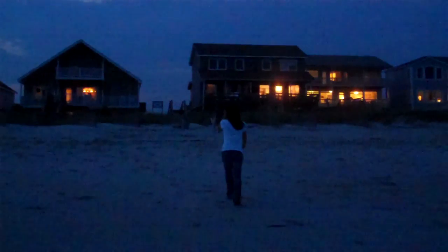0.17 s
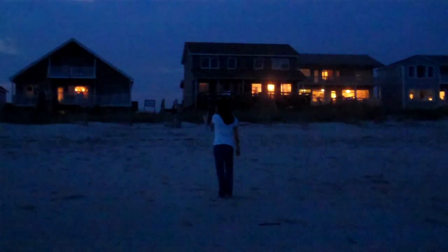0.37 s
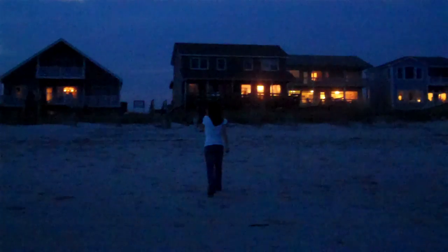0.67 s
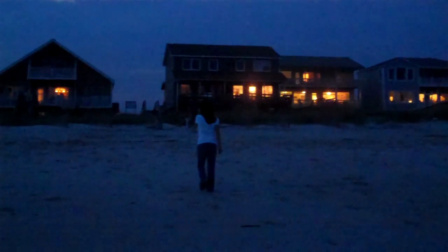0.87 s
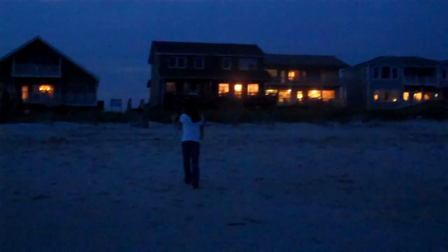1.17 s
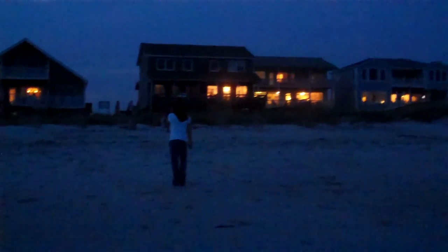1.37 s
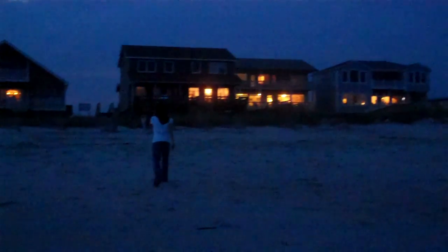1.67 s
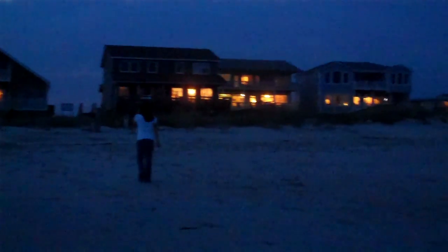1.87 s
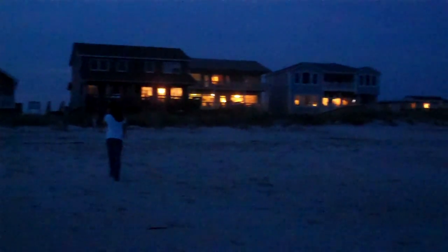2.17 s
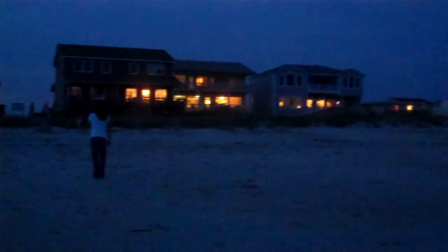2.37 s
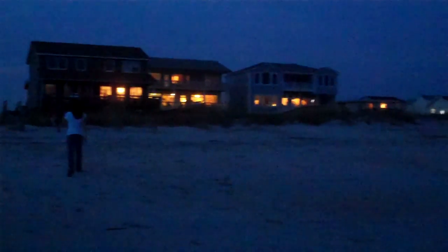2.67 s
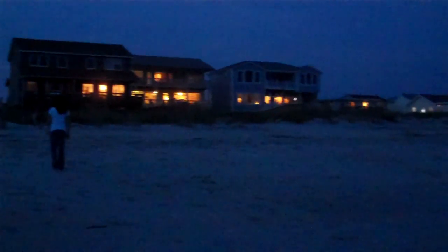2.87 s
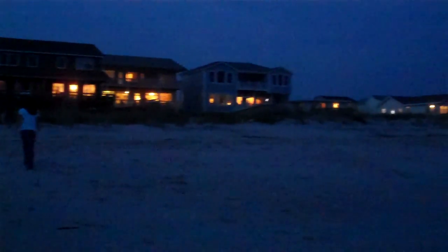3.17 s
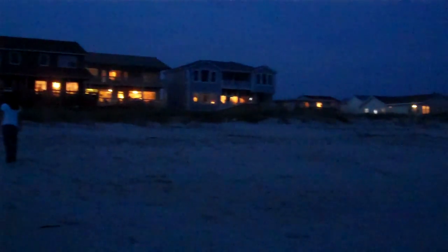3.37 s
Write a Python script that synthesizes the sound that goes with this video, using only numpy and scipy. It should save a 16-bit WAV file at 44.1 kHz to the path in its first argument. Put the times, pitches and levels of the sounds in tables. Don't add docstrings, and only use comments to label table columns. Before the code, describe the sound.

Wind buffets and rumbles against a small stereo microphone while surf hisses steadily behind it.

```python
import sys
import numpy as np
from scipy import signal
from scipy.io import wavfile
from scipy.ndimage import uniform_filter1d

SR = 44100
rng = np.random.default_rng(int(sys.argv[2]) if len(sys.argv) > 2 else 0)


def field_ratio(decibels):
    return 10 ** (np.asarray(decibels, dtype=float) / 20)


def store_wav(level_fs):
    pcm = np.round(np.clip(np.atleast_2d(level_fs), -1, 1) * 32767)
    wavfile.write(sys.argv[1], SR, pcm.T.astype(np.int16))


N = 154791
LEFT, RIGHT = 0, 1


def evened(x):
    return x / np.sqrt(np.mean(x ** 2) + 1e-20)


def read(points, hz):
    f, value = np.transpose(points)
    return np.interp(np.log(hz + 1), np.log(f + 1), value)


def drifting_patches(noise, frames, bands):
    slow = uniform_filter1d(noise, size=frames, axis=0)
    return evened(uniform_filter1d(slow, size=bands, axis=1))


# [t/s, level/dB, extra roar of the breaking
# crest/dB]
WAVE = [(0.0, -44.5, 2.5), (0.49, -41.5, 2), (0.8, -43, 3.5), (1.24, -40.5, 1), (1.81, -43.5, 1.5),
        (1.83, -46.5, 0), (2.61, -47.5, -1), (3.1, -43, 0), (3.15, -46.5, -0.5), (3.5, -47, -1),
        (3.51, -43, 0)]
# [f/Hz, level/dB per Hz]
FOAM = [(150, 1.5), (450, 4), (800, -0.5), (1300, -1), (2050, -6), (2450, -8), (4500, -12.5), (8500, -27.5),
        (11000, -31.5), (13000, -36)]
# [f/Hz, correlation]
SAME = [(150, .6), (450, .9), (1200, .85), (2500, .55), (5000, .72), (8500, .5), (12000, .5)]
# [f/Hz, lead/rad]
LEAD = [(0, 0), (1700, -.4), (2600, -2.1), (3400, -3), (5700, -3.5), (8200, -5.8), (12000, -6.3),
        (13600, -8.5)]
# [f/Hz, level/dB]
LEAN = [(60, -8), (150, -3), (360, -2.5), (900, -1.5), (2210, -2), (5450, -6.5), (13400, -16)]


def surf():
    size, hop = 512, 128
    roar_top_hz, patchy_db, flicker_db = 2210, 0.76, 0.35
    frames, hz = N // hop + 5, np.fft.rfftfreq(size, 1 / SR)
    a, b, c, d, patches = rng.standard_normal((frames, len(hz), 5)).T
    flicker = drifting_patches(patches, 40, 4)
    patches = drifting_patches(patches, 6, 24)

    same = np.clip(read(SAME, hz), -1, 1)[:, None]
    left = a + 1j * b
    right = same * left + np.sqrt(1 - same ** 2) * (c + 1j * d)
    right *= (field_ratio(-read(LEAN, hz)) * np.exp(-1j * read(LEAD, hz)))[:, None]

    t = np.arange(frames) * hop / SR
    s, level_db, roar_db = np.transpose(WAVE)
    crest_db = np.interp(t, s, roar_db) / (1 + (hz[:, None] / roar_top_hz) ** 8)
    wave_db = crest_db + np.interp(t, s, level_db) - 0.5
    foam_db = read(FOAM, hz)[:, None] + patchy_db * patches + flicker_db * flicker
    z = np.array([left, right]) * field_ratio(foam_db + wave_db)
    return signal.istft(z, nperseg=size, noverlap=size - hop)[1][:, :N]


def eddies(low_hz, high_hz, slope_db, count=12):
    per_s, spread_db = 520, 3.0
    out = np.zeros(N)
    for hz in np.geomspace(low_hz, high_hz, count):
        u = np.arange(0, 1.6, hz / SR)
        lump = np.hanning(len(u)) * np.sin(2 * np.pi * (u + rng.random()))
        hits = (rng.random(N) < per_s / count / SR) * rng.choice([-1., 1.], N)
        hits *= field_ratio(spread_db * np.minimum(rng.exponential(1, N), 3))
        train = evened(signal.oaconvolve(hits, lump)[:N])
        out += field_ratio(slope_db * np.log2(hz / low_hz)) * train
    return evened(out)


# [t/s, left port level/dB, right port level/dB]
BREEZE = [(0, -29, -23.5), (.2, -35, -29.5), (.5, -38, -28.5), (.8, -33, -45), (1.1, -36.5, -28),
          (1.3, -20, -24), (1.6, -28, -32), (1.8, -25, -35), (1.95, -55, -29), (2.2, -18.5, -31),
          (2.55, -35, -27.5), (2.7, -28, -40), (2.85, -30, -30.5), (3.1, -9.5, -27), (3.22, -46, -45),
          (3.38, -42.5, -42), (3.51, -19, -31)]


def breeze(side, rumble, flutter):
    flutter_db = -11.5
    columns = np.transpose(BREEZE)
    level_db = np.interp(np.arange(N) / SR, columns[0], columns[1 + side])
    return field_ratio(level_db) * (rumble + field_ratio(flutter_db) * flutter)


# [peak t/s, width/s, level/dB, flutter over rumble/dB]
LEFT_BUFFETS = [(0.223, 0.016, -32, -12), (1.197, 0.046, -27, -32), (1.401, 0.026, -5.5, -16),
                (1.445, 0.049, -19, -2), (1.513, 0.062, -17.5, -20), (1.559, 0.025, -21, -5),
                (1.705, 0.016, -16, -21), (1.757, 0.025, -13, 7), (1.784, 0.008, -7, -9),
                (1.827, 0.034, -37, -25), (1.853, 0.19, -16.5, -7.5), (1.895, 0.0092, -41, -17),
                (1.98, 0.007, -15.5, -4), (2.047, 0.019, -11.5, -13), (2.117, 0.05, -19.5, -8),
                (2.143, 0.041, -21, -9), (2.17, 0.011, -6, -1), (2.256, 0.01, -14, -10),
                (2.388, 0.038, -8, -9), (2.461, 0.013, -16.5, -8), (2.496, 0.016, -11.5, -13),
                (2.599, 0.026, -14.5, -12), (2.813, 0.022, -16, -8), (2.853, 0.013, -15, -17),
                (2.933, 0.014, -11, 3), (2.991, 0.029, -22, 4), (3.034, 0.059, -17.5, 12),
                (3.057, 0.016, -15, -2), (3.091, 0.049, -9.5, -3.5), (3.19, 0.03, -26, -7)]
RIGHT_BUFFETS = [(0.047, 0.029, -31, -15), (0.084, 0.014, -18, 1), (0.163, 0.014, -21, -25),
                 (0.202, 0.0071, -25, -4), (0.462, 0.038, -23, -9), (0.514, 0.011, -22, 9),
                 (0.629, 0.042, -22, -16), (0.696, 0.021, -19, -24), (0.788, 0.024, -22, -31),
                 (0.947, 0.016, -15, -21), (1.084, 0.02, -24, -6), (1.276, 0.018, -12, -5),
                 (1.348, 0.024, -26, -9), (1.416, 0.022, -22, -24), (1.457, 0.011, -1, -6),
                 (1.501, 0.031, -19, -7), (1.572, 0.016, -3, -3), (1.633, 0.012, -12, -12),
                 (1.773, 0.065, -16.5, -8), (1.813, 0.016, -26, -3.6), (1.883, 0.036, -19, 0),
                 (2.072, 0.02, -28, -17), (2.131, 0.051, -22, -26), (2.166, 0.02, -25, -2.4),
                 (2.191, 0.082, -21, -2), (2.437, 0.077, -26, -2), (2.924, 0.0054, -14, -15),
                 (3.01, 0.022, -20, -15), (3.065, 0.018, -13, -24), (3.134, 0.01, -8, -6.5)]


def buffets(side, rumble, flutter):
    snap_hz, snap_db = 1300, -21.5
    rumble_lingers = 0.6
    band = signal.butter(2, [snap_hz / 2, snap_hz], "bandpass", fs=SR, output="sos")
    snap = evened(signal.sosfilt(band, rng.standard_normal(N)))
    t, out = np.arange(N) / SR, np.zeros(N)
    for s, width, db, flutter_db in (LEFT_BUFFETS, RIGHT_BUFFETS)[side]:
        near = slice(max(round((s - 2 * width) * SR), 0), round((s + 2 * width) * SR))
        shape = np.exp(-2.8 * ((t[near] - s) / width) ** 2)
        size = np.sqrt(np.mean(shape ** 2))
        low = evened(shape ** rumble_lingers * rumble[near]) * size
        high = evened(shape * flutter[near]) * size
        high += field_ratio(snap_db + 0.61 * (db + 24)) * shape ** 2 * snap[near]
        gust = low + field_ratio(flutter_db) * high
        out[near] += field_ratio(db) * gust / np.sqrt(1 + field_ratio(flutter_db) ** 2)
    return out


# [t/s, peak level/dB, f/Hz]
LEFT_SLAPS = [(0.22, -8.5, 190), (1.2608, -15, 220), (1.3758, -6, 120), (1.4003, -4, 700),
              (1.3896, -7, 100), (1.4017, -2, 130), (1.4143, -3, 372), (1.442, -7.5, 257),
              (1.4516, -3, 210), (1.4644, -13, 260), (1.5128, -4.5, 131), (1.5431, -11.5, 240),
              (1.5531, -10.5, 130), (1.5613, -4, 198), (1.7015, -13, 230), (1.7326, -9, 330),
              (1.754, -6, 476), (1.7554, 0.5, 382), (1.7637, -14, 510), (1.7744, -0.5, 220),
              (1.7907, 2, 210), (1.792, -5, 60), (1.7941, 4, 430), (1.7957, -6, 600), (1.8278, -10, 170),
              (1.8947, -12, 260), (2.0488, -14, 252), (2.1157, -6.5, 260), (2.1653, -8, 210),
              (2.1731, -4.5, 140), (2.2583, -7.5, 228), (2.356, -2, 340), (2.3706, -5.5, 434),
              (2.3749, -2.5, 150), (2.3893, -3.5, 218), (2.4052, -4.5, 247), (2.492, -13, 110),
              (2.507, -9, 140), (2.5851, -6, 218), (2.611, -14.5, 110), (2.8523, -12, 150),
              (2.9291, -4.5, 370), (2.9316, -5.5, 180), (2.9758, -8, 150), (2.9892, -13, 210),
              (2.9944, -7, 440), (3.0164, -12, 420), (3.0277, -6, 140), (3.0334, 1, 210), (3.0505, -9, 290),
              (3.0579, -4, 140), (3.0629, -5, 380), (3.0824, -1, 320), (3.0905, -1, 320), (3.1073, -3, 950),
              (3.1088, -2, 150), (3.1141, -3.5, 335), (3.1181, -7, 278), (3.128, -2.5, 340),
              (3.179, -9, 101)]
RIGHT_SLAPS = [(0.088, -14, 75), (0.162, -14, 110), (0.454, -13, 100), (0.594, -13, 65), (0.6226, -9, 180),
               (0.6405, -6.5, 340), (0.9455, -12, 139), (1.268, -19, 310), (1.2757, -2, 360),
               (1.2946, -10, 260), (1.3344, -15, 346), (1.3468, -6, 290), (1.4126, -9, 140),
               (1.4304, -11, 430), (1.4543, -6, 490), (1.394, -15, 85), (1.434, -15, 75), (1.4503, -5, 120),
               (1.4618, -10, 80), (1.4643, -9, 190), (1.4978, -9, 230), (1.5599, -11, 240),
               (1.5667, -0.5, 280), (1.504, -15, 80), (1.5743, -4, 110), (1.633, -9, 310),
               (1.636, -12.5, 80), (1.7383, -11, 300), (1.7879, -6, 390), (1.8107, -2.5, 250),
               (1.8973, -13, 328), (2.071, -4, 492), (2.1237, -12, 85), (2.145, -12, 75), (2.1594, -7, 100),
               (2.19, -15, 90), (2.38, -15, 85), (2.417, -15, 70), (2.4378, -13, 95), (2.1612, -13, 260),
               (2.1661, -3, 597), (2.925, -9.5, 240), (3.011, -9, 280), (3.044, -4, 507),
               (3.0677, -10, 140), (3.1308, -5.5, 160)]


def slaps(side):
    ring = 0.6
    out = np.zeros(N)
    for s, db, hz in (LEFT_SLAPS, RIGHT_SLAPS)[side]:
        u = np.arange(0, 4, hz / SR)
        swing = np.sin(2 * np.pi * u ** 0.96)
        onset = np.tanh(u / 0.12)
        fade = np.exp(-u / ring) * np.hanning(2 * len(u))[len(u):]
        out[round(s * SR):][:len(u)] -= 1.39 * field_ratio(db) * swing * onset * fade
    return out


def port(side):
    sweep, full_slap = 0.8, 0.12
    rumble, flutter = eddies(32, 230, -0.6), eddies(190, 640, -3.5)
    wind = breeze(side, rumble, flutter) + buffets(side, rumble, flutter)
    slap = slaps(side)
    swept = np.minimum(uniform_filter1d(abs(slap), size=300) / full_slap, 1)
    return wind * (1 - sweep * swept) + slap


def scene():
    return surf() + np.array([port(LEFT), port(RIGHT)])


def left_choke():
    start_s, length_s = 1.7875, 0.00367
    from_middle = abs(np.arange(N) / SR - start_s - length_s / 2)
    return np.clip(from_middle / 0.000186 - length_s / 0.000394, 0, 1)


def overload(x):
    room = np.where(x > 0, 0.85, 1.5)
    return room * np.tanh(x / room)


def top_cut(x):
    return signal.sosfilt(signal.butter(12, 14140, fs=SR, output="sos"), x)


def record(dry):
    low_cut = signal.butter(1, 24, "highpass", fs=SR, output="sos")
    top = signal.butter(6, 9830, fs=SR, output="sos")
    x = signal.sosfilt(low_cut, dry)
    x = overload(x * np.array([left_choke(), np.ones(N)]))
    x = signal.sosfilt(top, x)
    end_fade = np.minimum((N - np.arange(N)) / 100, 1)
    return top_cut(np.clip(x, -1, 1) * end_fade)


dry = scene()
out = record(dry)
store_wav(out)
```